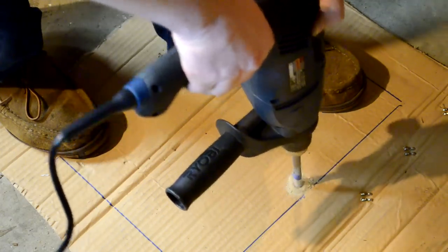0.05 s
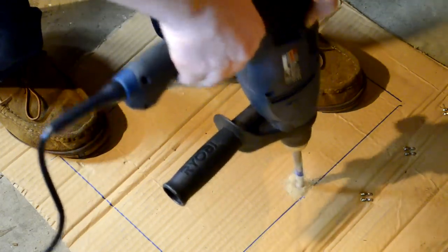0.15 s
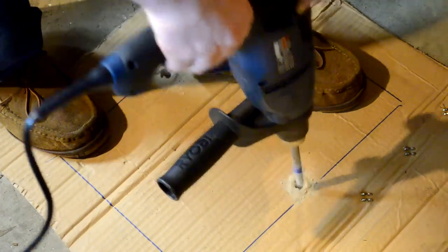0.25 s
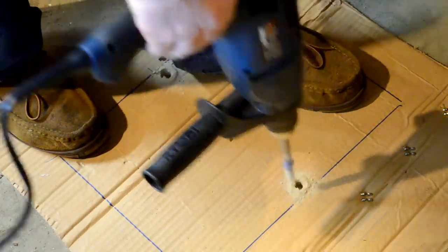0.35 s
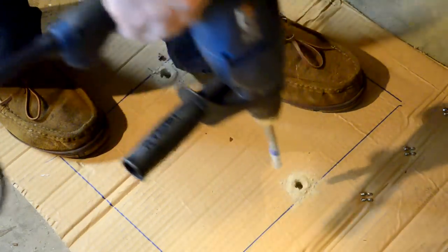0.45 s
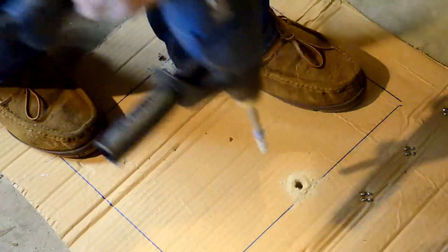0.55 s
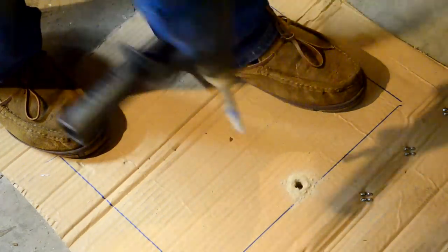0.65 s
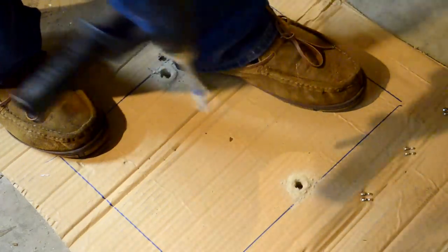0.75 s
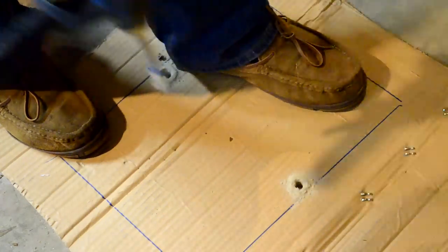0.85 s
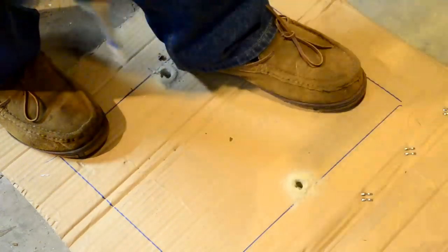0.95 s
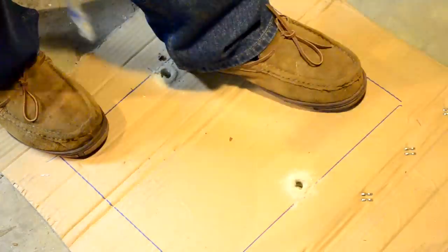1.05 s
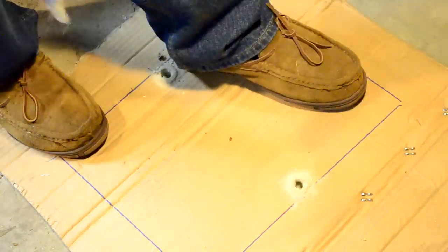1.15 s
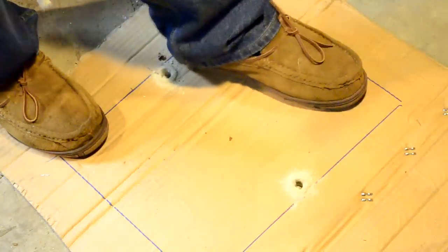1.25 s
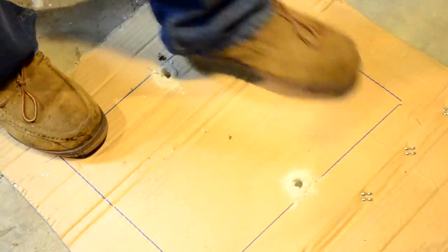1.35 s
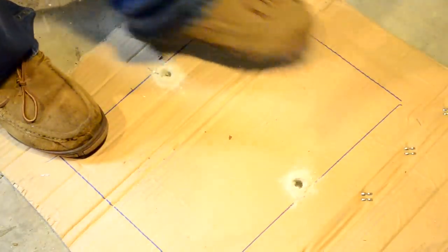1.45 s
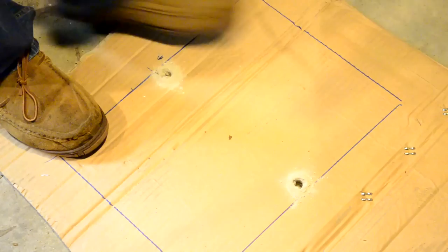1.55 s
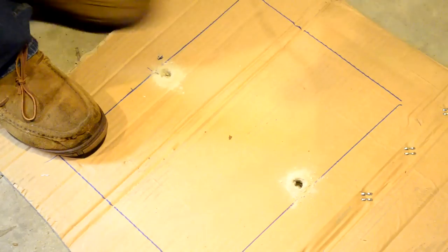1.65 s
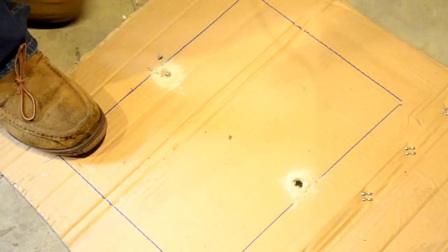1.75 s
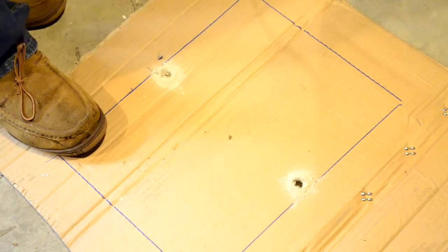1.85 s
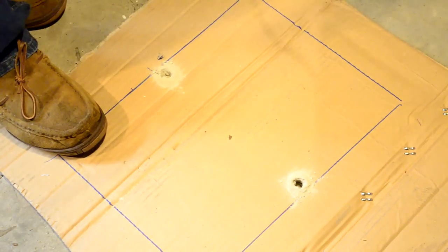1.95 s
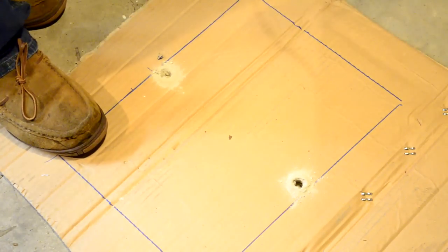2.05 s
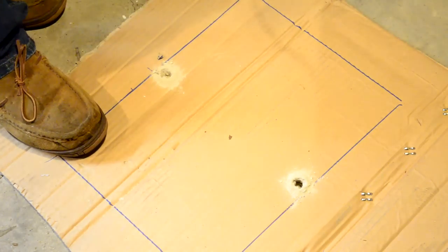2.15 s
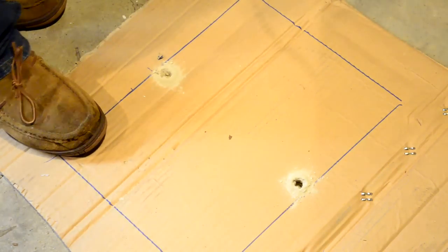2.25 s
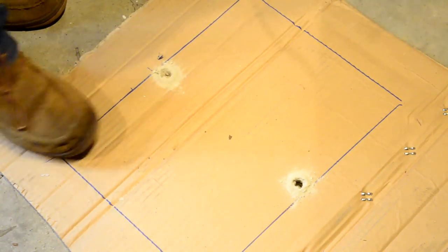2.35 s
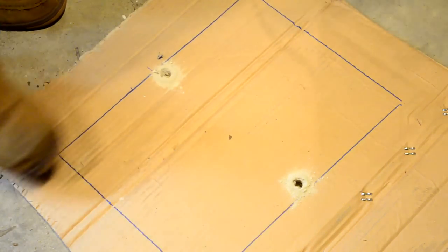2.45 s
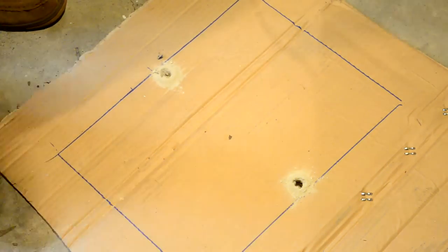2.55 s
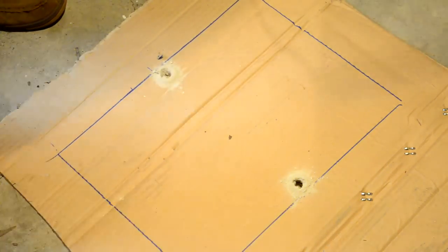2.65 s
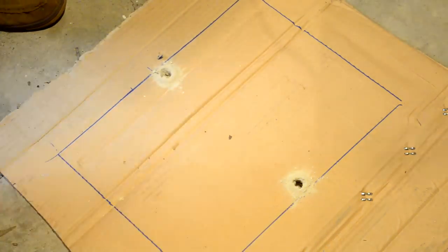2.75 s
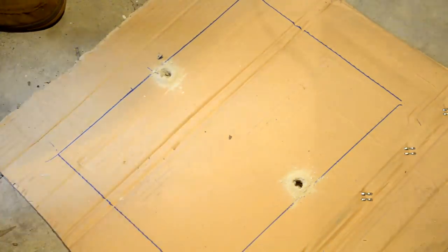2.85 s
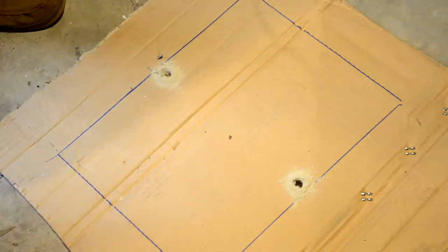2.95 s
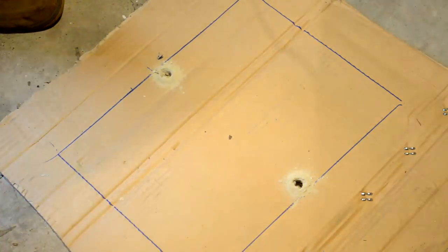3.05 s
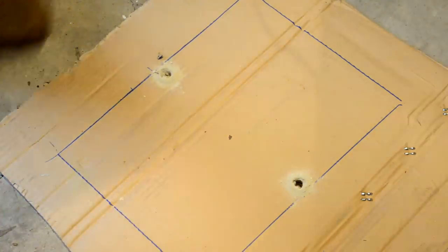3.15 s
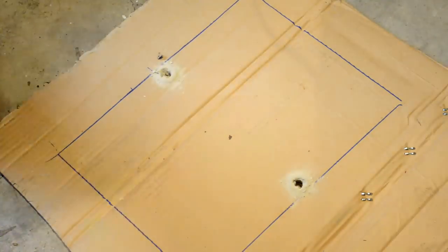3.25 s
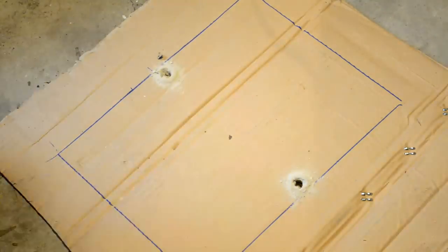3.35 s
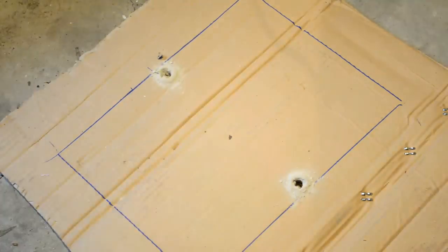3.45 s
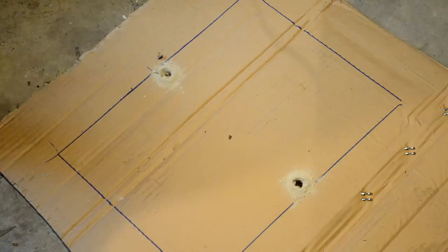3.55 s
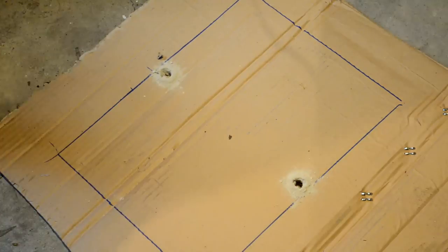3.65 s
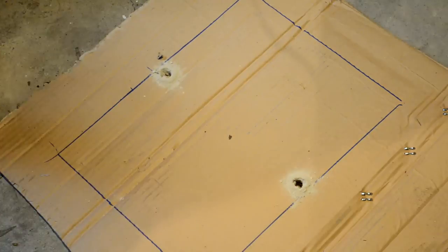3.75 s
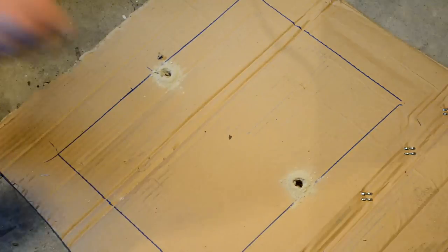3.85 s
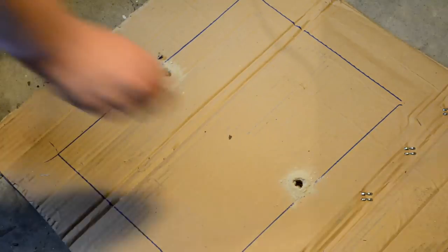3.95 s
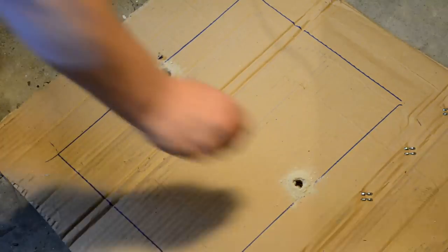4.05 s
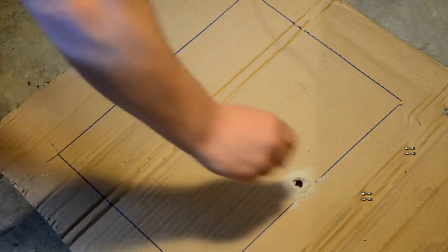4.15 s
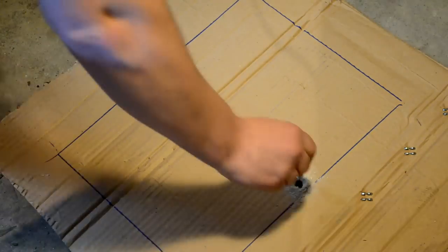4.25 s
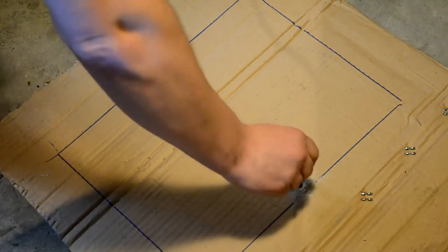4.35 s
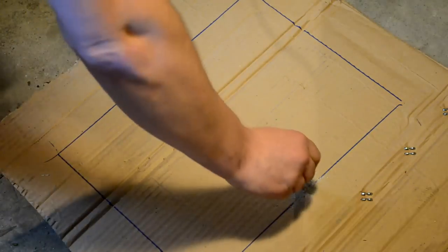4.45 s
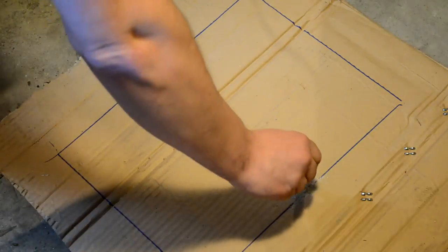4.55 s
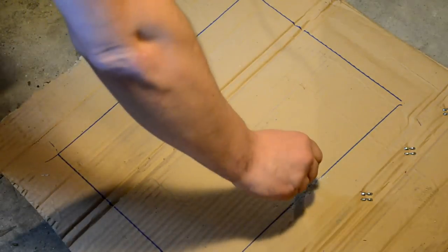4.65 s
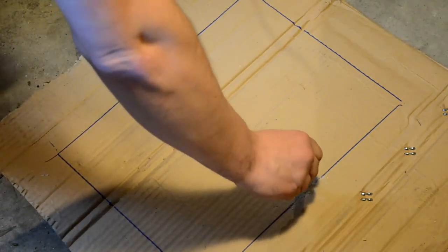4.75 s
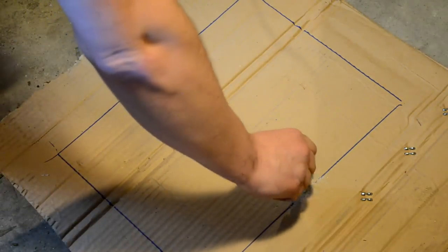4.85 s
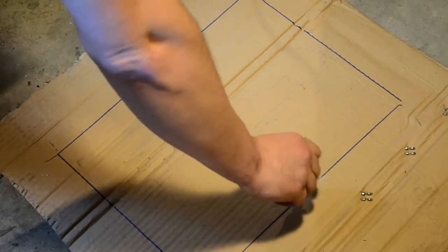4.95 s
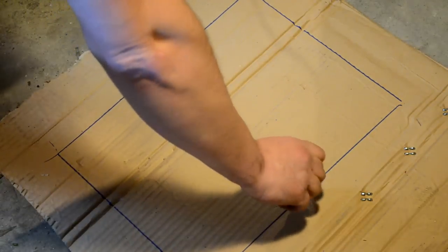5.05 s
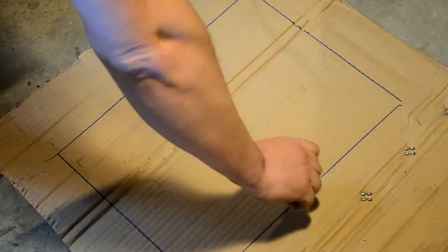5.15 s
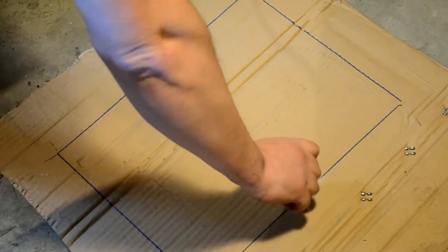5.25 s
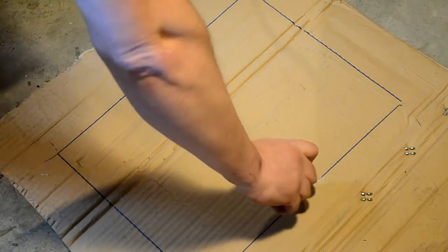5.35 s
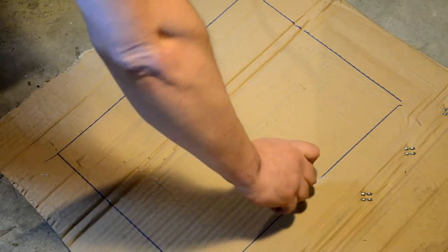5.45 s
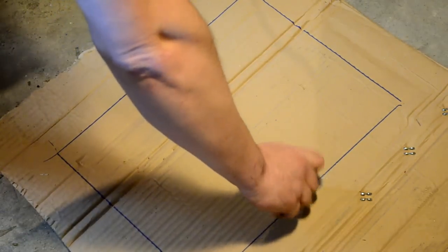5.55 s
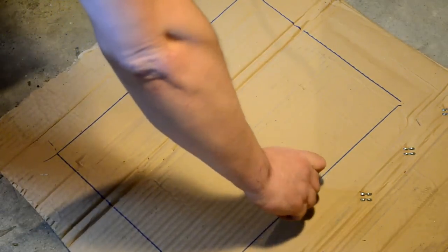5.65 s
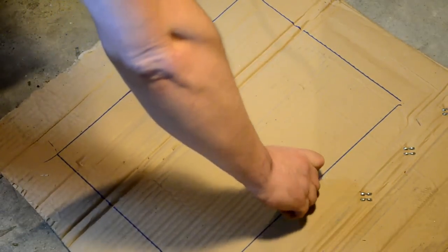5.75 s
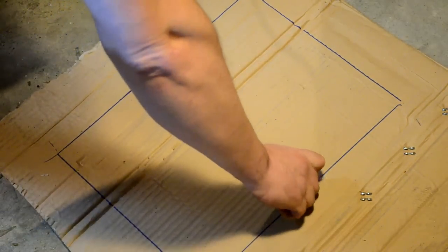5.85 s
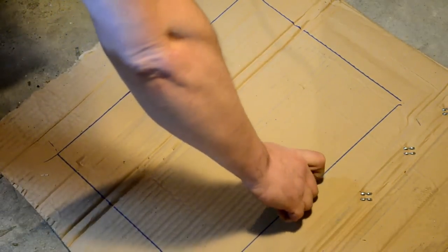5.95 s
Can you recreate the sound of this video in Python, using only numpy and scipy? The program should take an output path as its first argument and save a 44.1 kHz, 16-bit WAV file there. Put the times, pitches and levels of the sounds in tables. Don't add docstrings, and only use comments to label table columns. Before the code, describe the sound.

A small microphone near the floor picks up a loud drill winding down, hissing and whining in falling pitch until it stops. In the quiet that follows there are dull shoe steps, cardboard scuffs and small clicks. Near the end come irregular gritty metallic scrapes and creaks as an anchor is twisted into the hole. Short hard-walled room echo, faint electrical hum.

```python
import sys
import numpy as np
from scipy import signal
from scipy.fft import rfft, irfft, next_fast_len
from scipy.io import wavfile

SR = 44100
rng = np.random.default_rng(int(sys.argv[2]) if len(sys.argv) > 2 else 0)


def dump(signal):
    limited = np.clip(np.atleast_2d(signal).T, -1, 1)
    pcm = np.round(limited * 32767).astype(np.int16)
    wavfile.write(sys.argv[1], SR, pcm)


def boost(x):
    u = np.asarray(x, float) / 20
    return 10 ** u


N = 264159
RUN_IN = 3000


def rms_one(x):
    return x / np.sqrt(np.mean(x ** 2) + 1e-20)


def in_time(rows):
    s, *columns = np.transpose(rows)
    return [np.interp(np.arange(N) / SR, s, c) for c in columns]


def at_hz(points, hz):
    points = np.array(points)
    return np.interp(np.log(np.maximum(hz, 1)), np.log(points[:, 0]), points[:, 1])


def colour(x, points):
    size = 2 * next_fast_len(N // 2 + 4096)
    gain = boost(at_hz(points, np.fft.rfftfreq(size, 1 / SR)))
    cepstrum = irfft(np.log(gain), size)
    cepstrum[1:size // 2] *= 2
    cepstrum[size // 2 + 1:] = 0
    response = np.exp(rfft(cepstrum))
    return irfft(rfft(x, size) * response, size)[:N]


def drift(rate_hz):
    r = np.exp(-80 * np.pi * rate_hz / SR)
    noise = rng.standard_normal(N // 40 + 2002)
    slow = signal.lfilter([1], [1, -2 * r, r * r], noise)[2000:]
    return np.interp(np.arange(N) / 40, np.arange(len(slow)), rms_one(slow))


def resonate(x, hz, width_hz):
    r2 = np.exp(-2 * np.pi * width_hz / SR)
    poles = [1, -(1 + r2) * np.cos(2 * np.pi * hz / SR), r2]
    return signal.lfilter([(1 - r2) / 2, 0, (r2 - 1) / 2], poles, x)


def grains(per_s, spread_db):
    sizes = boost(spread_db * np.minimum(rng.exponential(1, N), 4)) * rng.standard_normal(N)
    return rms_one(sizes * (rng.random(N) < per_s / SR))


def burst(t60_s, swell_s):
    t = np.arange(SR // 4) / SR
    return (1 - np.exp(-t / max(swell_s, 1e-4))) * boost(-60 * t / np.clip(t60_s, .008, .3))


def contact_noise():
    return rng.standard_normal(SR // 4 + RUN_IN)


def struck(noise, hz, share):
    push = noise.copy()
    push[RUN_IN + 8] += 12
    once = resonate(push, hz, share * hz)
    return rms_one(resonate(once, hz, 0.68 * share * hz)[RUN_IN:])


def add(track, s, sound):
    i = round(s * SR)
    track[i:i + len(sound)] += sound[:N - i]


# f/Hz, level/dB per Hz
AIR_SPECTRUM = [(12, -44), (20, -20.5), (42, -10.5), (232, -6.5), (491, -15.5), (597, -7.5), (649, -8),
                (725, -10.5), (788, -7), (2680, -22.5), (5690, -40), (11400, -38), (15500, -54.5)]
AIR_DB = -65


def room_air():
    noise = rms_one(colour(rng.standard_normal(N), AIR_SPECTRUM))
    return boost(AIR_DB) * noise * boost(.5 * drift(4))


# f/Hz, level/dB rms
BALLAST_LINES = [(360, -82), (598, -73.5), (720.5, -66), (840, -84.5), (960, -80.5), (1200, -85)]


def ballast():
    t = np.arange(N) / SR
    hum = np.zeros(N)
    for hz, db in BALLAST_LINES:
        tone = np.sin(2 * np.pi * (hz * t + rng.random()))
        hum += np.sqrt(2) * boost(db + 0.64 * drift(3)) * tone
    return hum


# f/Hz, t60/s, level/dB
ECHO_BANDS = [(398, 0.77, -11.5), (1500, 0.29, -8), (5000, 0.26, -14.5)]


def workshop(x):
    t = np.arange(SR // 2) / SR
    first_wall = np.clip((t - .006) / 0.0029, 0, 1)
    tail = np.zeros(len(t))
    for hz, t60_s, db in ECHO_BANDS:
        band = resonate(rng.standard_normal(len(t)), hz, 3.1 * hz)
        decay = boost(-60 * t / t60_s) * first_wall
        tail += boost(db) * band * decay * np.sqrt(14 / t60_s / SR)
    return signal.fftconvolve(x, tail)[:N]


# t/s, length/s, level/dB, f/Hz, fade/dB per s
CREEPS = [
    (1.03, .55, -49, 270, 31),
    (3.07, .19, -66, 1440, 5),
    (4.24, .58, -74.5, 106, 3),
]
BOARD_SHARE = 0.18


def board():
    t = np.arange(N) / SR
    out = np.zeros(N)
    for s, length_s, db, hz, fade_db_per_s in CREEPS:
        once = resonate(rng.standard_normal(N), hz, BOARD_SHARE * hz)
        hum = rms_one(resonate(once, hz, BOARD_SHARE * hz))
        gate = np.clip(np.minimum(t - s, s + length_s - t) / 0.032, 0, 1)
        out += boost(db - fade_db_per_s * (t - s)) * gate * hum
    return out


# t/s, level/dB
SOLE_LEVEL = [(1.9, -46.5), (2.0, -63.5), (3.0, -56.5), (3.76, -64.5), (3.97, -55.5), (4.25, -58.5),
              (4.45, -70.5), (4.9, -59), (5.08, -48.5), (5.3, -70), (5.65, -77), (5.76, -34.5), (5.85, -58)]
# f/Hz, level/dB per Hz
RUSTLE_SPECTRUM = [(150, -12), (400, 0), (900, -3), (1500, 4.5), (2500, -6), (4000, -18), (7000, -38.5)]
# f/Hz, level/dB per Hz
CLOTH_SPECTRUM = [(1500, -30), (3000, 3.5), (5000, -4), (8000, -6), (12000, -10.5), (15500, -16.5)]
# peak t/s, level/dB, swell and fade/dB per s
SLEEVE_SWEEPS = [(1.9, -68, 26), (2.87, -70, 43.5), (3.29, -69, 49.5), (3.85, -74, 30), (4.16, -61.5, 49),
                 (5.05, -64, 54), (5.76, -83, 97.5), (5.99, -59, 45.5)]
CLOTH_FLOOR_DB = -86


def shuffle():
    t = np.arange(N) / SR
    sole_db, = in_time(SOLE_LEVEL)
    sweeps = boost(CLOTH_FLOOR_DB)
    for s, db, fade_db_per_s in SLEEVE_SWEEPS:
        sweeps = sweeps + boost(db - fade_db_per_s * np.abs(t - s))
    rustle = rms_one(colour(grains(3700, spread_db=-2.0), RUSTLE_SPECTRUM))
    swish = rms_one(colour(grains(8000, spread_db=-7.5), CLOTH_SPECTRUM))
    return rustle * boost(sole_db - 4.5 + 1.8 * drift(14)) + swish * sweeps * boost(-7.0 + 1.5 * drift(12))


# t/s, peak level/dB, f/Hz
GRIT_CLICKS = [(2.002, -52, 2580), (2.034, -70.5, 7640), (2.11, -67, 6450), (2.2, -64.5, 7900),
               (2.325, -64, 8600), (2.409, -59, 3150), (2.549, -61, 3180), (2.776, -47.5, 3570),
               (2.778, -52, 1800), (3.13, -73, 6100), (3.376, -66, 5400), (3.46, -52, 1500),
               (3.611, -53, 3100), (3.817, -51, 3600), (3.818, -61, 8900), (3.95, -59, 4000),
               (4.192, -42.5, 3650), (4.194, -38.5, 1700), (5.405, -75, 1670), (1.83, -52.5, 11200),
               (2.002, -64, 9000), (2.894, -50, 690), (3.892, -50.5, 2600), (5.574, -35.5, 1300),
               (5.741, -40, 1300)]
CLICK_SHARE, CLICK_T60_S, CLICK_SWELL_S = .5, .036, .0003
# t/s, peak level/dB, f/Hz
PART_CHINKS = [
    (3.814, -42.5, 1620),
    (3.818, -51, 2410),
]
CHINK_SHARE, CHINK_T60_S = .25, .08
# t/s, peak level/dB, f/Hz, t60/s
FLOOR_SCUFFS = [(1.71, -58, 10000, 0.055), (1.829, -43.5, 5000, .07), (2.205, -50.5, 2450, 0.213),
                (2.364, -46.5, 2240, .15), (2.671, -53.5, 3430, .3), (2.999, -62, 3460, .12),
                (3.234, -42, 2120, 0.068), (3.236, -60.5, 7900, .1), (3.33, -59, 8500, 0.039)]
SCUFF_WIDTH_HZ, SCUFF_SWELL_PER_T60 = 4400, 0.133


def ticks():
    rows = [(*row, CLICK_SHARE, CLICK_T60_S, CLICK_SWELL_S) for row in GRIT_CLICKS]
    rows += [(*row, CHINK_SHARE, CHINK_T60_S, CLICK_SWELL_S) for row in PART_CHINKS]
    for s, db, hz, t60_s in FLOOR_SCUFFS:
        rows.append((s, db, hz, SCUFF_WIDTH_HZ / hz, t60_s, SCUFF_SWELL_PER_T60 * t60_s))
    out = np.zeros(N)
    for s, peak_db, hz, share, t60_s, swell_s in rows:
        noise = contact_noise()
        spray = .26 * share * noise[RUN_IN:]
        add(out, s, boost(peak_db - 3.5) * (struck(noise, hz, share) + spray) * burst(t60_s, swell_s))
    return out


# t/s, peak level/dB, f/Hz
HOLLOW_BOARD = [(1.006, -36.5, 223), (1.884, -56.5, 160)]
METAL_PINGS = [(3.217, -41.5, 783), (4.64, -52, 926), (5.239, -35, 1600)]
HEAVY_STEPS = [(1.03, -58, 110), (1.825, -45.5, 258)]
LIGHT_STEPS = [(2.895, -43.5, 450), (2.915, -49, 450), (2.97, -43.5, 518), (3.846, -51.5, 349),
               (3.971, -46, 480), (4.194, -39.5, 594), (5.375, -41, 540), (5.405, -46, 725)]
ANCHOR_RAPS = [(3.892, -50.5, 910), (4.762, -52.5, 1010), (4.948, -42, 990), (5.064, -56, 945),
               (5.512, -45, 1310)]
# width / pitch, t60/s, crack over knock/dB
KNOCK_KINDS = [
    (0.52, 0.22, -30),
    (.12, .085, -22),
    (2.15, 0.41, -14),
    (2, .11, -6.5),
    (.45, .055, -19),
]


def knocks():
    tables = [HOLLOW_BOARD, METAL_PINGS, HEAVY_STEPS, LIGHT_STEPS, ANCHOR_RAPS]
    out = np.zeros(N)
    for table, (share, t60_s, crack_db) in zip(tables, KNOCK_KINDS):
        for s, peak_db, hz in table:
            ring = struck(contact_noise(), hz, share) * burst(t60_s, 0.00035)
            crack = struck(contact_noise(), 1080, 0.3) * burst(0.69 * t60_s, 0.00037)
            floor = struck(contact_noise(), 168, 0.88) * burst(1.3 * t60_s, 0.013)
            thud = 0.086 * share * floor
            add(out, s, boost(peak_db - 1.5) * (ring + thud + boost(crack_db) * crack))
    return out


# t/s, peak level/dB, t60/s
ANCHOR_SLIPS = [(4.84, -34.5, 0.56), (4.865, -27.5, 0.074), (4.892, -31.5, 0.055), (4.948, -33, .21),
                (4.998, -35, 0.045), (5.043, -39.5, 0.075), (5.06, -22.5, 0.046), (5.086, -32.5, 0.11),
                (5.129, -44, .086), (5.179, -27, .065), (5.209, -34, 0.193), (5.235, -20, 0.05),
                (5.459, -41, 0.059), (5.526, -40.5, 0.13), (5.544, -44, .13), (5.568, -21, 0.07),
                (5.58, -17, 0.095), (5.609, -30.5, .066), (5.705, -28, .12), (5.739, -17.5, 0.064),
                (5.758, -25.5, 0.26), (5.779, -27, .088), (5.819, -33, .054), (5.886, -27, 0.089),
                (5.98, -26.5, .076)]
# f/Hz, width/Hz, level/dB
ANCHOR_MODES = [(624, 49, -18), (940, 5.5, 16.5), (1086, 150, -2.5), (1430, 18, -11), (1600, 34, 7.5),
                (1806, 100, -5), (2730, 92, -30), (2940, 9, -6.5), (4040, 160, -13.5), (4530, 28, -26.5)]
# f/Hz, level/dB per Hz
SLAB_SPECTRUM = [(71, -41.5), (120, -14), (512, -14.5), (580, -5.5), (678, -22.5), (1080, 6.5), (1370, -14),
                 (2810, -23.5), (5000, -46), (6500, -41), (11000, -120)]
# f/Hz, level/dB per Hz
GRIT_SPECTRUM = [(1470, -41.5), (2500, -25), (2800, -3.5), (3690, -22.5), (7730, -5.5), (13300, -31.5),
                 (15500, -40.5)]
SLIP_SWELL_S = .004
HAND_DAMPING_HZ = 160
GRIT_DB, GRIT_GROWS_DB_PER_S = -24.5, 5


def anchor():
    force, dust = np.zeros(N), np.zeros(N)
    for s, peak_db, t60_s in ANCHOR_SLIPS:
        grit_db = GRIT_DB + GRIT_GROWS_DB_PER_S * (s - ANCHOR_SLIPS[0][0])
        slip = burst(t60_s, SLIP_SWELL_S)
        add(force, s, boost(peak_db - 11) * slip)
        add(dust, s, boost(peak_db - 13.5 + grit_db) * slip)
    crush = grains(5000, spread_db=2.0)
    slab = colour(crush * force, SLAB_SPECTRUM) / np.std(colour(crush, SLAB_SPECTRUM))
    rings = np.zeros(N)
    for k, (hz, width_hz, db) in enumerate(ANCHOR_MODES):
        rings += (-1) ** k * boost(db) * resonate(crush * force, hz, width_hz + HAND_DAMPING_HZ)
    grit = rms_one(colour(grains(12000, spread_db=1.5), GRIT_SPECTRUM)) * dust
    return boost(2.0) * slab + boost(6.5) * rings + grit


START_HZ, FRICTION_HZ_PER_S, OIL_DRAG_PER_S, FAN_DRAG = 7585, 2617.7, .20377, 28.537


def rotor():
    hz = np.linspace(START_HZ, 0, 4000)
    loss_hz_per_s = FRICTION_HZ_PER_S + OIL_DRAG_PER_S * hz + FAN_DRAG * (hz / 1000) ** 2
    s = np.cumsum(START_HZ / 4000 / loss_hz_per_s)
    return np.interp(np.arange(N) / SR, s - s[0], hz)


# f/Hz, level/dB per Hz
ROAR_SPECTRUM = [(35, -64), (60, -47), (113, -34), (257, -15.5), (301, -21), (339, -8), (668, -2), (723, 4),
                 (799, 0), (1140, 5.5), (2040, -4), (3490, -7), (4340, -13), (5190, -26.5), (7000, -28.5),
                 (9100, -36), (15400, -120)]
# f/Hz, width/Hz, level/dB
SHELL_MODES = [(270, 8.2, -8), (560.6, 21, -4.5), (671, 17, 6), (741, 15, 13.5), (950, 11, 1),
               (1148, 22, 3.5), (1177, 30, 0), (1373, 5.3, -3), (1441, 21, 2), (1670, 23, 0.5),
               (1707, 12, 0), (2520, 24, -16.5), (2970, 18, -4.5), (3230, 90, -14)]
# t/s, level/dB
ROAR_LEVEL = [(0, -15.5), (.52, -23.5), (.91, -29.5), (1.29, -35.5), (1.61, -41), (1.85, -43),
              (1.89, -51.5), (1.98, -72)]
THIN_HZ, THIN_FROM_S, THIN_PER_S = 1300, 1.01, 1


def gear_roar(rattle, throb, roar_db):
    t = np.arange(N) / SR
    shell = np.zeros(N)
    for k, (hz, width_hz, db) in enumerate(SHELL_MODES):
        shell += (-1) ** k * boost(db) * resonate(rattle * boost(3.5 * drift(9.8)), hz, width_hz)
    body = rms_one(colour(rattle * throb, ROAR_SPECTRUM)) + .33 * rms_one(shell)
    lows = signal.sosfilt(signal.butter(1, THIN_HZ, fs=SR, output="sos"), body)
    thinned = body - np.clip(THIN_PER_S * (t - THIN_FROM_S), 0, .8) * lows
    return thinned / np.std(body) * boost(roar_db + 0.71 * drift(22))


# f/Hz, level/dB per Hz
BRUSH_SPECTRUM = [(2350, -37.5), (4000, 2.5), (4740, -3), (5340, -0.5), (8890, -5.5), (9960, -5.5),
                  (11600, -8), (15500, -21)]
VENT_HZ, VENT_WIDTH_HZ, VENT_DB = 10400, 1500, -71.5


def brush_hiss(rattle, throb, hiss_db, bar_hz):
    brushes = rms_one(colour(rng.standard_normal(N) * throb, BRUSH_SPECTRUM))
    vent = rms_one(resonate(rattle, VENT_HZ, VENT_WIDTH_HZ)) * boost(VENT_DB + 2 * drift(8))
    vent_open = np.clip(2 * bar_hz / SPARKLESS_HZ - 1, 0, 1)
    return brushes * boost(hiss_db + drift(21)) + vent * vent_open


# f/Hz, level over roar/dB
BAR_RADIATION = [(2150, -8), (2450, 1), (3500, -7), (3850, -16), (4700, -18), (5000, -12), (6200, -17),
                 (7570, -25)]
# f/Hz, level over roar/dB
OCTAVE_RADIATION = [(2300, -17), (2900, -9), (3700, -11), (5860, -16), (7240, -17), (9900, -25.5),
                    (15100, -40)]
# f/Hz, level over roar/dB
FAN_RADIATION = [(2100, -37), (2800, -18), (3600, -17), (5500, -22), (8600, -31), (9600, -25),
                 (11660, -22.5)]
# multiple of bar rate, level over hiss/dB
UPPER_WHINE = [(2.5, -14), (3.0, -5), (3.5, -7), (4.0, -4), (4.5, -9), (5.0, -5), (5.5, -6), (6.0, -7),
               (6.5, -12), (7.0, -12), (8.0, -13)]
BARS = 24
BLADES_PER_BAR = 1.54


def rotor_whine(bar_hz, phase, roar_db, hiss_db):
    lines = []
    for k, casing in [(1, BAR_RADIATION), (2, OCTAVE_RADIATION), (BLADES_PER_BAR, FAN_RADIATION)]:
        lines.append((k, roar_db + at_hz(casing, k * bar_hz)))
    for k, db in UPPER_WHINE:
        lines.append((k, hiss_db + db - .8 + at_hz(BRUSH_SPECTRUM, np.maximum(k * bar_hz, 5000))))
    whine = np.zeros(N)
    for multiple, level_db in lines:
        hz = multiple * bar_hz
        flutter_db = min(2.4 * multiple, 3.3) * drift(12)
        wobble = (.2 + .2 * multiple) * drift(100) + .3 * np.sin(phase / BARS)
        passed = np.clip((hz - 1000) / 1000, 0, 1) * (hz < 16000)
        tone = np.sin(multiple * phase + wobble)
        whine += np.sqrt(2) * boost(level_db + flutter_db) * passed * tone
    return whine


HISS_DB, HISS_FADE_DB_PER_S = -13, 2.5
SPARKLESS_HZ, SPARKLESS_DB = 1150, -16.5
STOP_S, STOP_FADE_S = 2.2, .08


def drill():
    t = np.arange(N) / SR
    bar_hz = rotor()
    roar_db, = in_time(ROAR_LEVEL)
    sparkless = np.clip(2 - 2 * bar_hz / SPARKLESS_HZ, 0, 1)
    hiss_db = roar_db + HISS_DB - HISS_FADE_DB_PER_S * t + SPARKLESS_DB * sparkless
    phase = 2 * np.pi * np.cumsum(bar_hz) / SR
    throb = 1 + 0.056 * np.sin(phase / BARS)
    rattle = grains(12000, spread_db=1.5)
    running = gear_roar(rattle, throb, roar_db) + brush_hiss(rattle, throb, hiss_db, bar_hz)
    running += rotor_whine(bar_hz, phase, roar_db, hiss_db)
    return running * np.clip((STOP_S - t) / STOP_FADE_S, 0, 1)


def scene():
    close = drill() + knocks() + ticks() + anchor()
    background = shuffle() + ballast() + room_air() + board()
    return (close + workshop(close) + background)[None]


def low_pass(x):
    return signal.sosfilt(signal.butter(12, 15640, fs=SR, output="sos"), x)


OVERLOAD = .8


def record(dry):
    mix = OVERLOAD * np.tanh(dry / OVERLOAD)
    return low_pass(mix)


dry = scene()
out = record(dry)
dump(out)
```